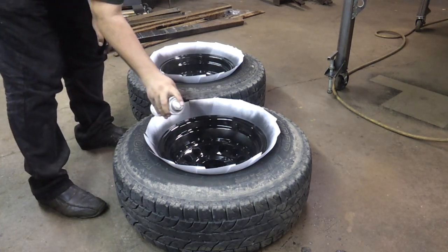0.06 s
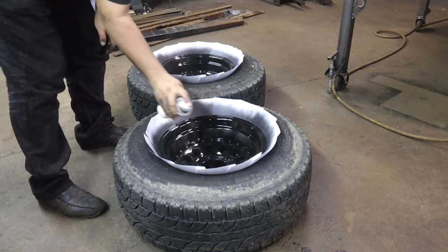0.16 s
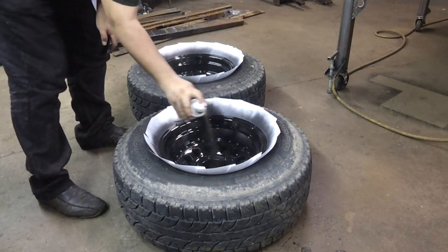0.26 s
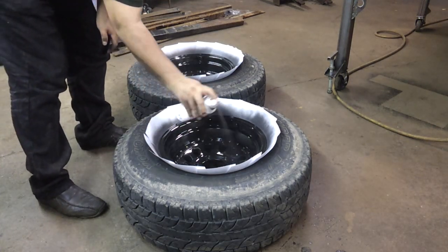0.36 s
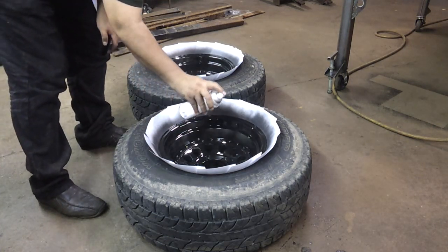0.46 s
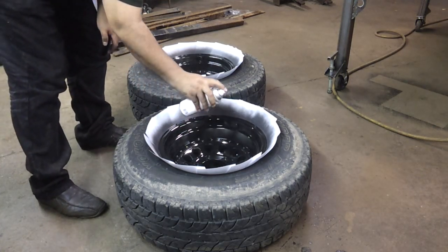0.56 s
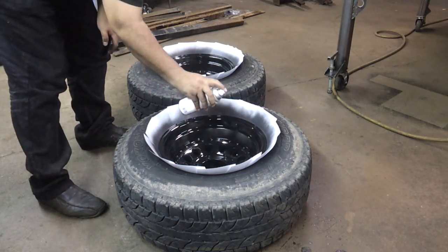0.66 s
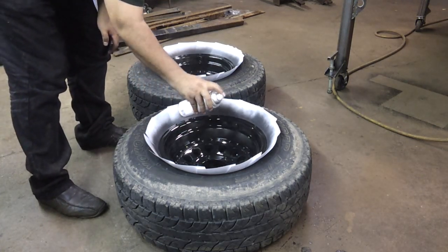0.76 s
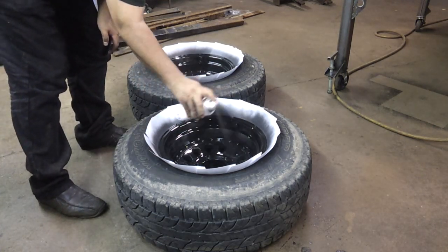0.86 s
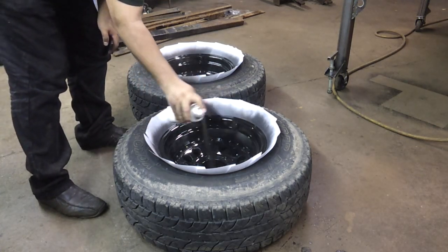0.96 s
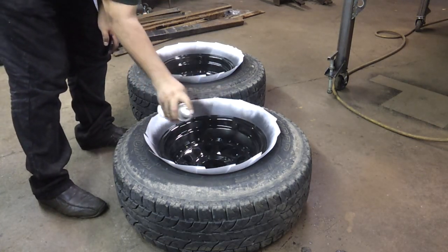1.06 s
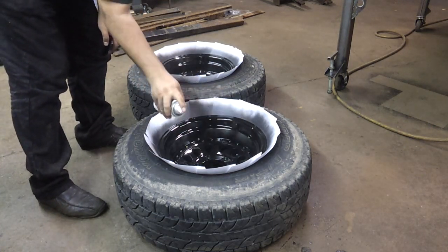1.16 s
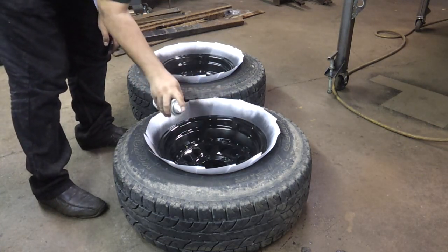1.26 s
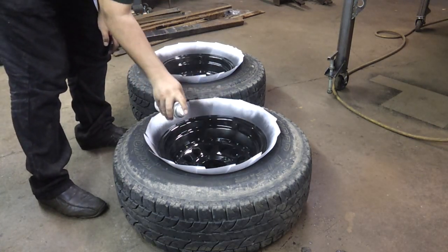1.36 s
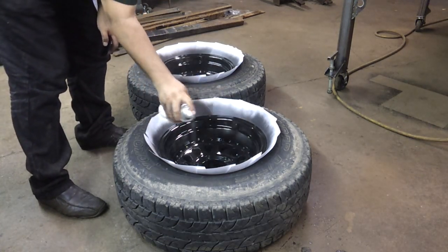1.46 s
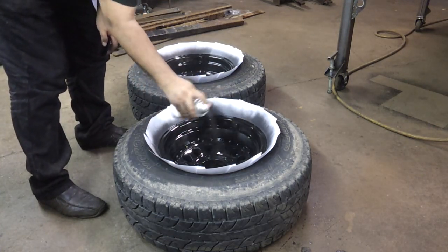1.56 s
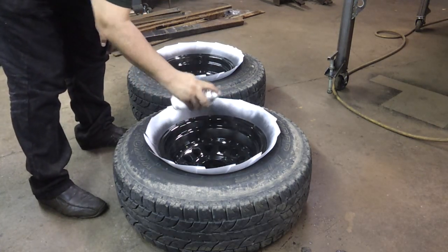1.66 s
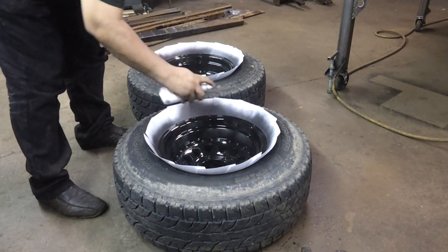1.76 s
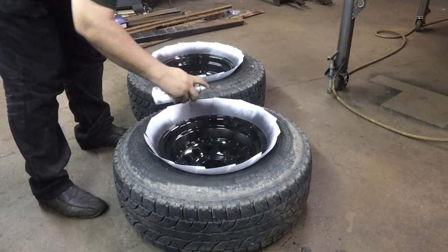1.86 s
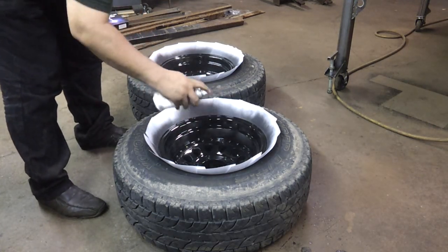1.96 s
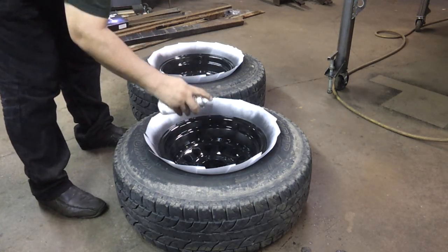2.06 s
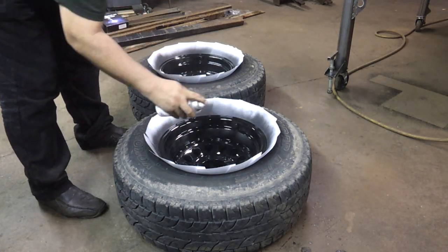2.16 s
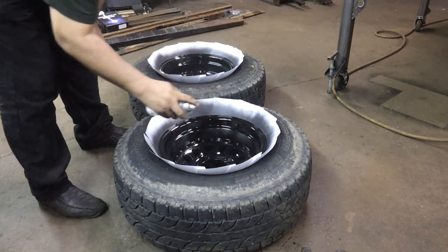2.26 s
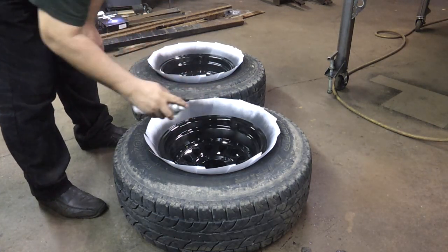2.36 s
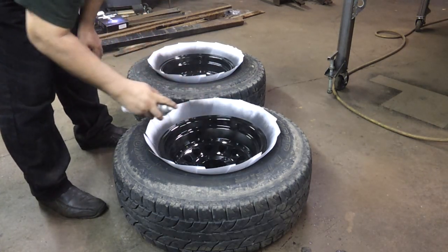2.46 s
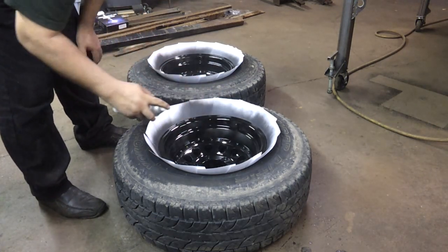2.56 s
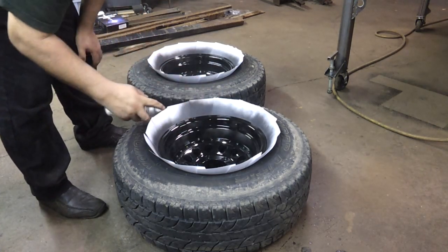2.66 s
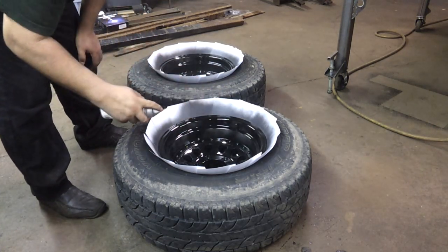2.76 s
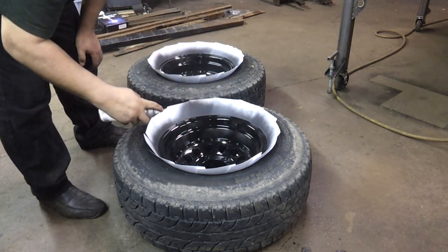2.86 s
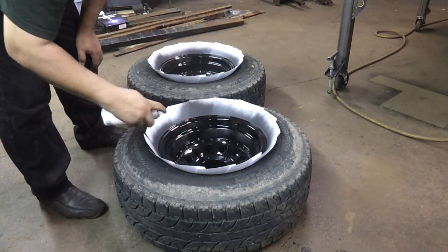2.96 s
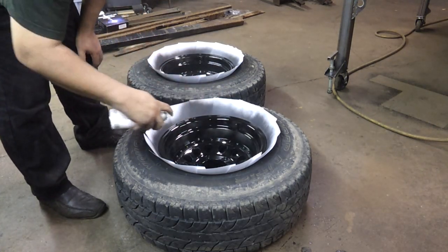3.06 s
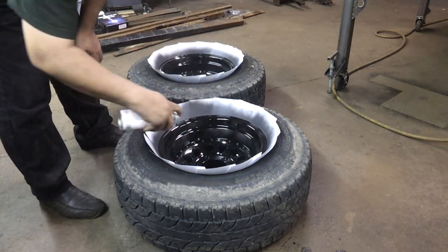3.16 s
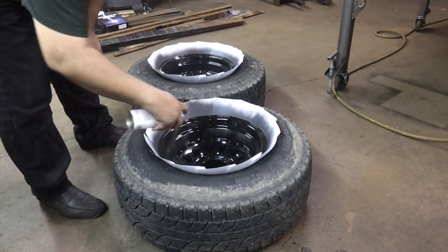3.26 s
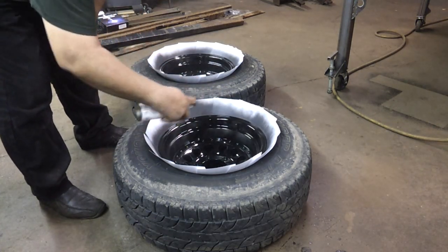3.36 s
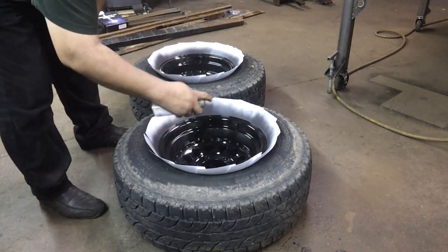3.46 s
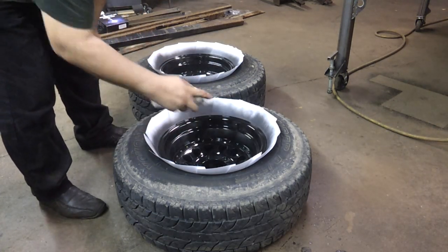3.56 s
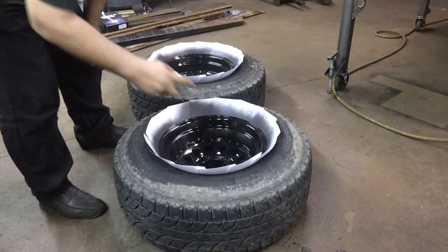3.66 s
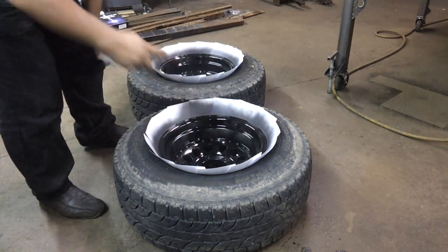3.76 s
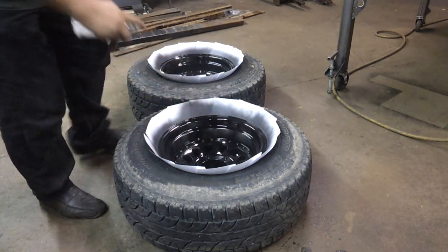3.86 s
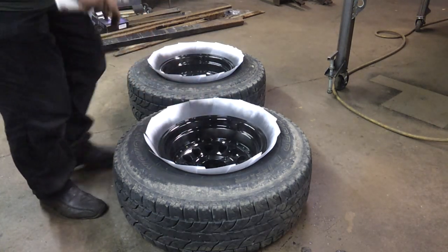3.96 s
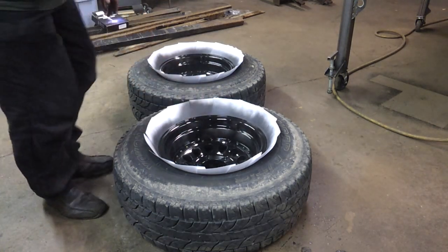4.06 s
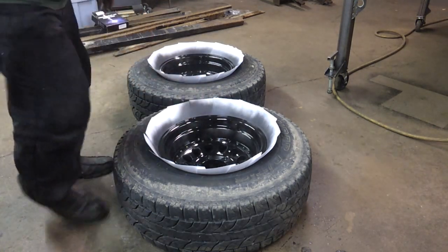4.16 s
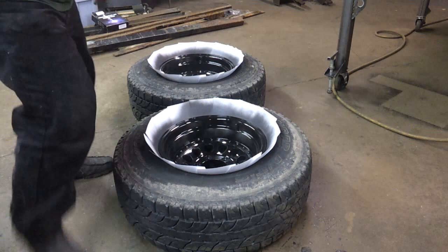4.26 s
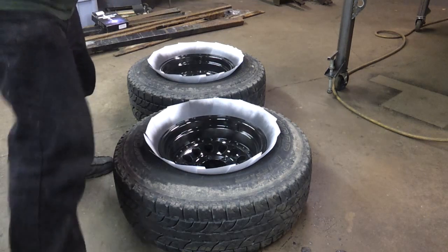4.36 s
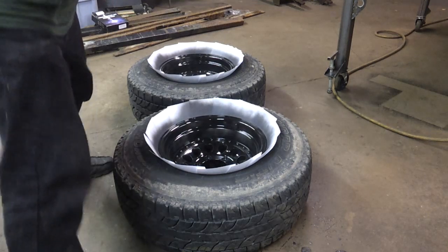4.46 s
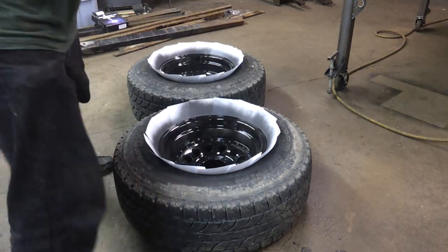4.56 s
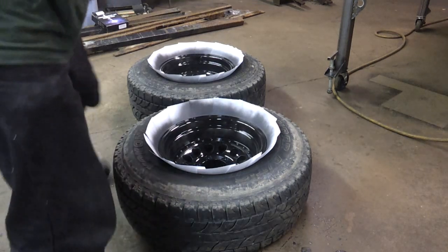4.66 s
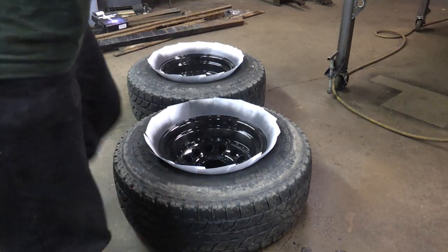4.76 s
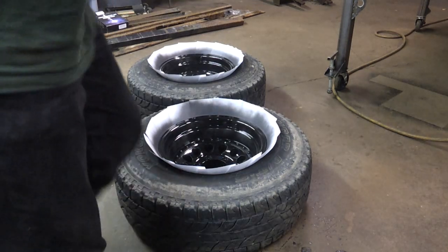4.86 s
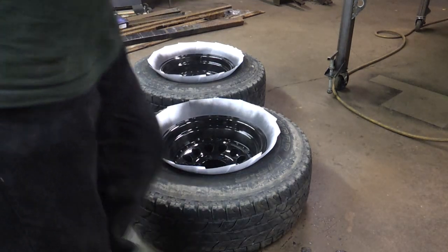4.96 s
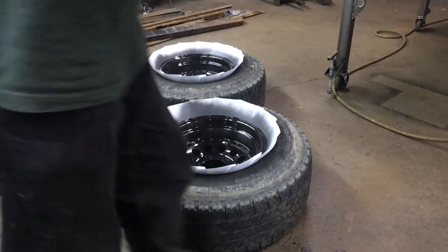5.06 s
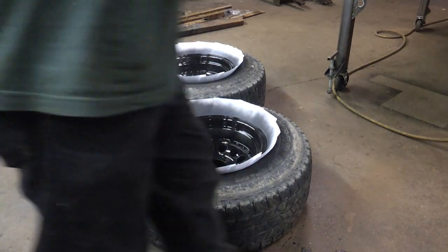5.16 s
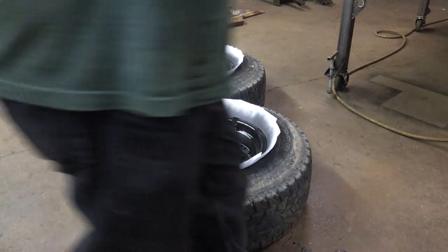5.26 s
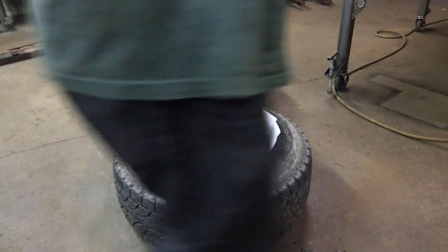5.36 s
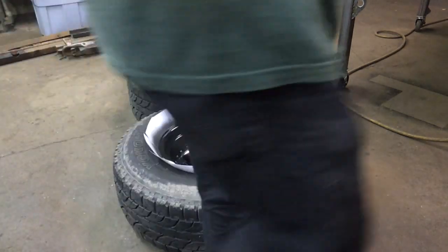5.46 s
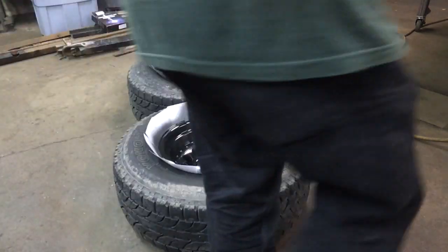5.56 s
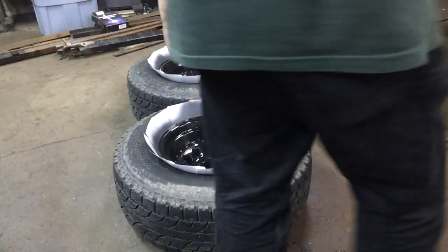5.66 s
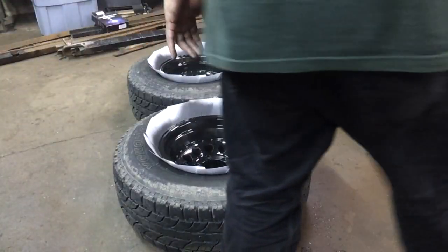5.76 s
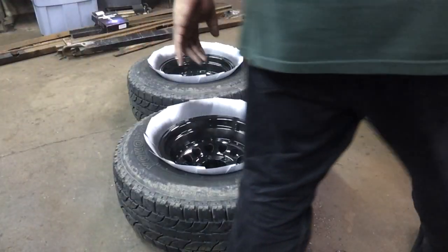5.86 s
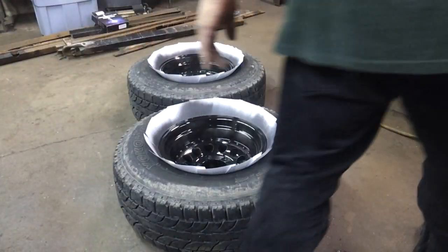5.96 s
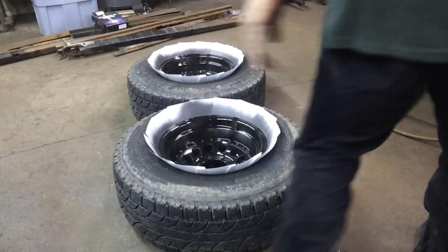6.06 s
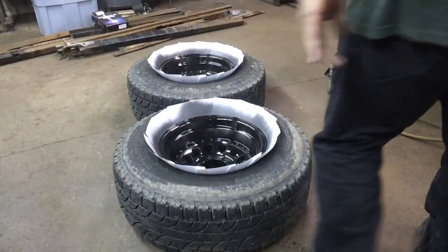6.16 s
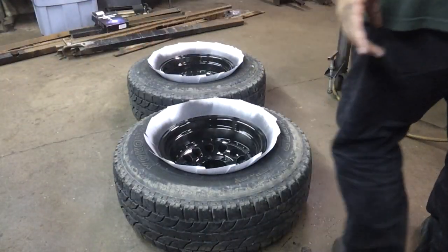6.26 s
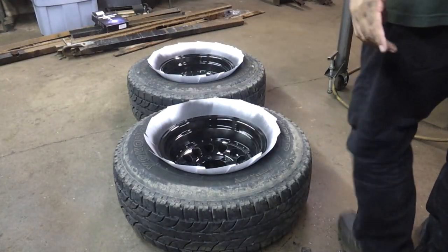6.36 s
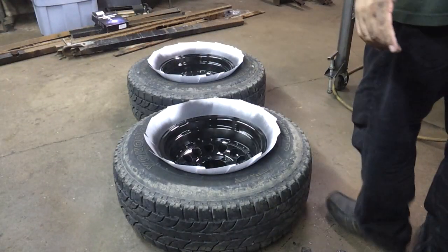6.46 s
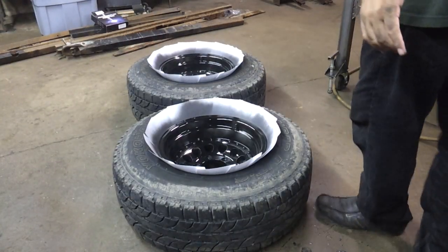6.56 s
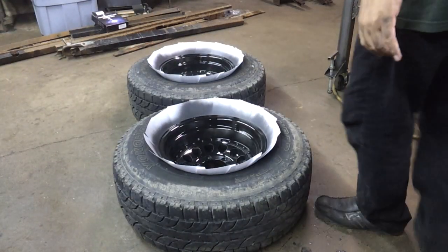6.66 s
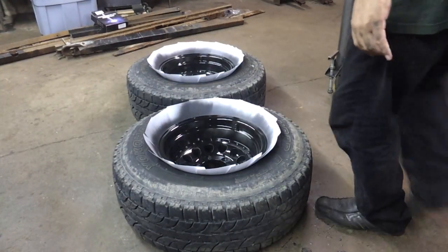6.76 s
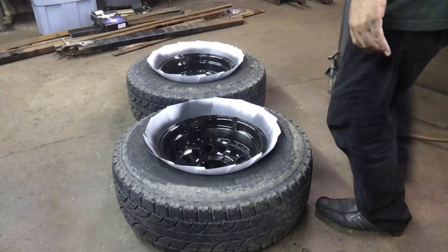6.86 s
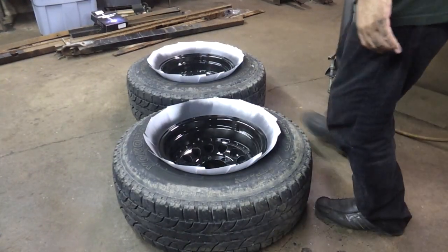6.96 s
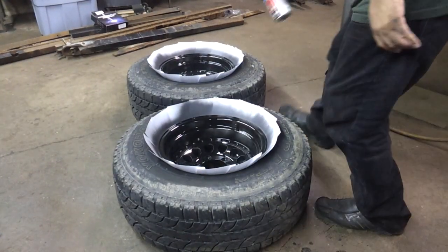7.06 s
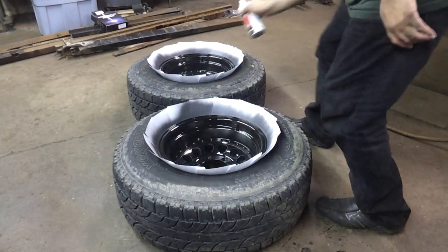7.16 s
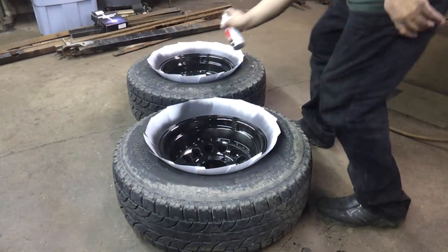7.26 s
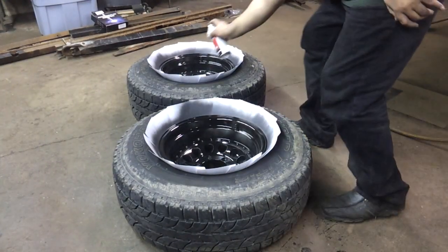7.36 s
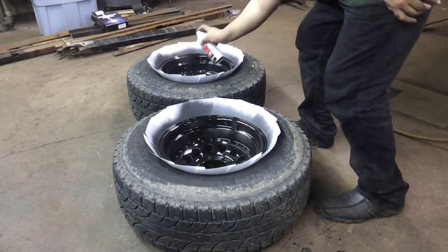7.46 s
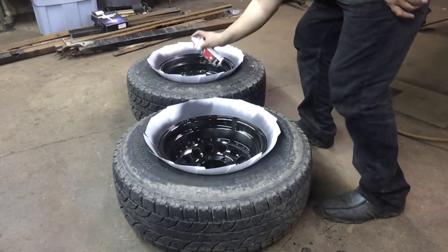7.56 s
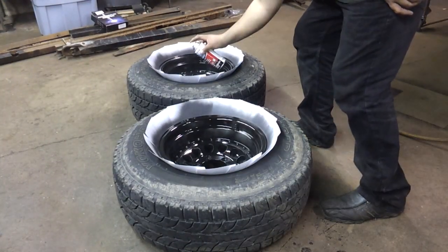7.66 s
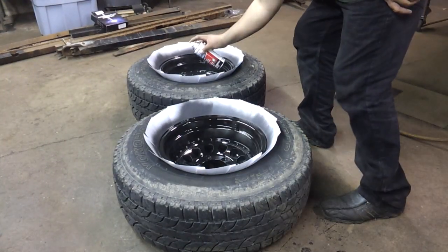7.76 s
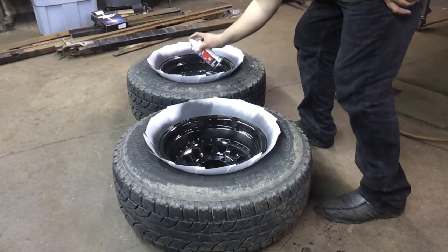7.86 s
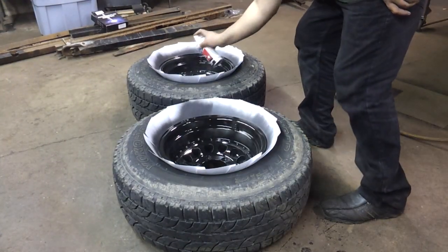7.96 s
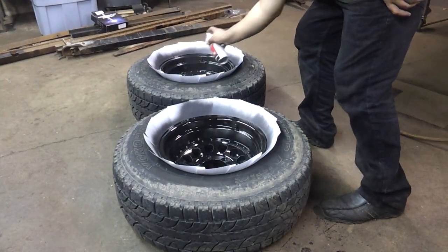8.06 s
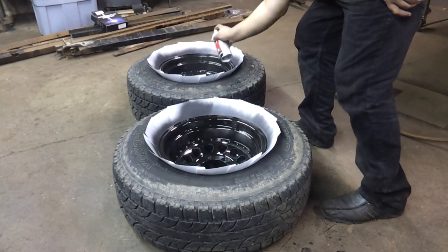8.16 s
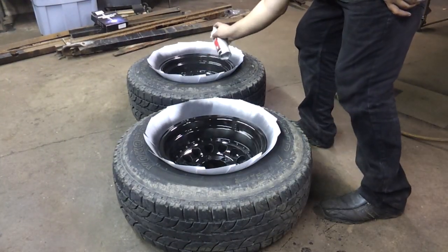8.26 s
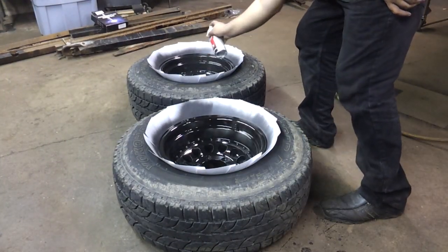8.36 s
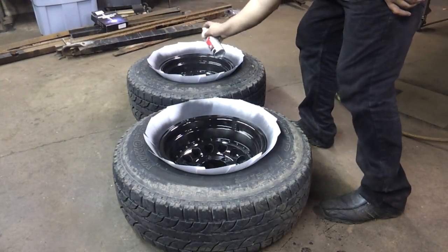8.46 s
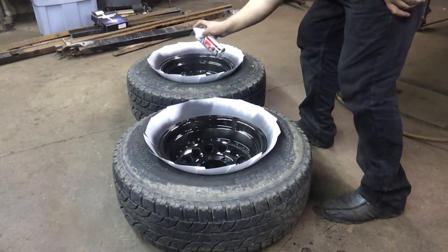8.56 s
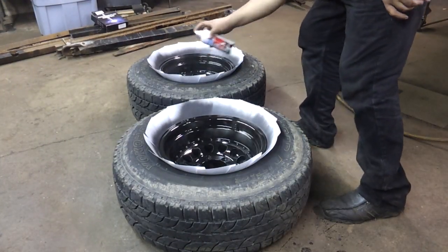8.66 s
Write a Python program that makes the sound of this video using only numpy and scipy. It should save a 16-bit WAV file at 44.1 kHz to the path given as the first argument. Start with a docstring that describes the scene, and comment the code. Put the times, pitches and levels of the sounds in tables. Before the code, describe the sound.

A low, slowly swelling hum fills a hard-walled workshop, with the fading echo of an earlier spray at the start. Bright aerosol bursts of about 0.3 seconds come at 0.14, 0.78 and 1.4, each surging at once then easing, with a faint valve whistle at the opening and a hissy echo after. Single metallic ball clacks fall at 1.9, 2.6 and, weaker, 2.9. A softer burst follows at 3.16. A scuff at 3.8 and a heel thud at 4.0 lead into vigorous can shaking from 4.05 to about 5.6: hard, irregular clacks, chatter and grainy rolling, loudest between 4.2 and 5.1, with another step at 4.45. Dull double footsteps and a drag land near 5.85, then lighter steps and scuffs at 6.5 and 7.0 to 7.4, with stray faint ticks. Short sprays return at 7.36, 7.85 and 8.48, slightly duller, the last running almost to the end.

```python
"""Spray can bursts in a workshop

A hand sprays paint from an aerosol can into a wheel in short bursts of shaped noise, with narrow valve whistles.
The mixing ball clacks and rolls: sharp contacts, chatter and grainy noise drive the resonances of the can.
Shoes step and drag round the tyres as low pushes, dull puffs and noise strokes, over the hum of a hard-walled hall.
Decaying noise tails make the echoes; one microphone with gain control and a soft ceiling hears it all.
"""
import sys
import numpy as np
from scipy import signal
from scipy.io import wavfile
from scipy.ndimage import uniform_filter1d

SR = 44100
rng = np.random.default_rng(int(sys.argv[2]) if len(sys.argv) > 2 else 0)


def dump(signal):
    """Clip the signal to [-1, 1] and save it as 16-bit WAV at the path in sys.argv[1]."""
    limited = np.clip(np.atleast_2d(signal).T, -1, 1)
    pcm = np.round(limited * 32767).astype(np.int16)
    wavfile.write(sys.argv[1], SR, pcm)


N = 383652

# Colour of the jet hiss. Each row: frequency in Hz, relative level in dB per Hz.
JET_COLOUR = [(4000, -17.5), (6000, -9.5), (8000, -2.5), (10500, 0), (13000, -3), (16000, -6.5)]
# Resonances of the can bottom. Each row: frequency in Hz, width in Hz, relative level in dB.
BOTTOM_MODES = [(1180, 560, 21), (1770, 1900, 18), (1970, 1940, 7)]


def gain_of(db):
    """Amplitude factor of a level in dB."""
    return 10 ** (np.asarray(db) / 20)


def evened(x):
    """The same sound at rms 1."""
    return x / np.sqrt(np.mean(x ** 2) + 1e-20)


def read(points, hz):
    """Reads a curve of (Hz, value) points along a logarithmic frequency axis."""
    f, value = np.transpose(points)
    return np.interp(np.log(hz + 1), np.log(f + 1), value)


def add(mix, s, sound):
    """Adds a sound to the mix at s seconds, cut off at the end of the mix."""
    part = mix[..., round(s * SR):][..., :sound.shape[-1]]
    part += sound[..., :part.shape[-1]]


def resonate(x, hz, width):
    """Shifts hz down to zero, smooths, and shifts back: a resonance of gain 1."""
    phase = 2 * np.pi * np.cumsum(np.broadcast_to(hz, x.shape[-1])) / SR
    turn = np.exp(1j * phase)
    r = np.exp(-np.pi * width / SR)
    return 2 * (turn * signal.lfilter([1 - r], [1, -r], x / turn)).real


def resonate_twice(x, hz, first_width, second_width):
    """Two resonances in a row at the same pitch, for steeper skirts."""
    return resonate(resonate(x, hz, first_width), hz, second_width)


def noise(spectrum, patchy_db, size=512):
    """Random short-time spectra with drifting patches, rms 1."""
    hz = np.fft.rfftfreq(size, 1 / SR)
    a, b, patches = rng.standard_normal((N * 4 // size + 5, len(hz), 3)).T
    patches = uniform_filter1d(patches, size=6, axis=0)  # across frequency
    patches = evened(uniform_filter1d(patches, size=12, axis=1))  # across time
    z = (a + 1j * b) * gain_of(read(spectrum, hz)[:, None] + patchy_db * patches)
    return evened(signal.istft(z, nperseg=size, noverlap=size * 3 // 4)[1][:N])


def causal(gain):
    """Impulse response with this gain that starts at once (minimum phase)."""
    log = np.log(np.r_[gain, gain[-2:0:-1]] + 1e-5 * gain.max())
    return np.fft.ifft(np.exp(log - 1j * signal.hilbert(log).imag)).real[:len(gain)]


def hum():
    """Broad hall noise and a few fuzzy low tones; all under 350 Hz swells slowly."""
    # The broad noise. Each row: frequency in Hz, relative level in dB per Hz.
    broad_colour = [(25, -45), (40, -43), (55, 0), (90, -14), (130, -5.5), (270, -5.5), (415, -12),
                    (700, -14.5), (1700, -19.5), (3200, -22), (4700, -22.5), (6000, -32.5), (7300, -26.5),
                    (10200, -25.5), (16000, -28.5)]
    # Machines somewhere in the hall. Each row: frequency in Hz, width in Hz, level in dB.
    drones = [(71.2, 16, -47.5), (135.2, 12, -41.5), (200.3, 4.5, -54)]
    # The lows waver about their mean. Each row: time in seconds, relative level in dB.
    low_swell = [(0.0, -39), (0.68, -36.5), (1.02, -37.5), (2.62, -37), (3.03, -35), (4.07, -37),
                 (4.43, -40.5), (5.18, -43), (5.74, -36.5), (6.49, -35.5), (6.86, -37), (8.3, -36),
                 (8.7, -32.5)]

    wide = gain_of(-32.5) * noise(broad_colour, patchy_db=1.5, size=2048)
    for hz, width, db in drones:
        wide += gain_of(db) * evened(resonate(rng.standard_normal(N), hz, width))
    low = signal.sosfiltfilt(signal.butter(2, 350, fs=SR, output="sos"), wide)
    s, db = np.transpose(low_swell)
    swell = gain_of(np.interp(np.arange(N) / SR, s, db - db.mean()))
    return wide + low * (swell - 1)


def hall_tail():
    """Dense echoes of random sign after the first wall, each band dying at its own speed; energy 1."""
    # How long the hall rings. Each row: frequency in Hz, time to fall by 60 dB in seconds.
    ring_times = [(200, 0.46), (1000, 0.52), (3000, 0.86), (7000, 0.93), (11000, 0.66), (16000, 0.57)]

    first_wall_s, build_up_s = 0.004, 0.0049
    taps = rng.standard_normal(SR) * np.clip((np.arange(SR) / SR - first_wall_s) / build_up_s, 0, 1)
    hz, t, z = signal.stft(taps, SR, nperseg=256)
    fade = gain_of(-60 * t / read(ring_times, hz)[:, None])
    tail = signal.istft(z * fade, SR, nperseg=256)[1][:SR]
    return tail / np.linalg.norm(tail)


def hall(x):
    """Three tails fed in turn, so that like sounds get unlike echoes."""
    turn = np.arange(N) / SR * 2.3  # half turns
    wet = np.zeros(N)
    for k in range(3):
        share = np.sqrt(2 / 3) * np.cos(np.pi * (turn + k / 3))  # the three powers sum to 1
        wet += signal.oaconvolve(x * share, hall_tail())[:N]
    return wet


def earlier_spray():
    """A burst that has just ended still hangs in the hall: jet noise fading steadily."""
    start_db, fade_db_per_s = -24.5, 75
    return gain_of(start_db - fade_db_per_s * np.arange(N) / SR) * noise(JET_COLOUR, patchy_db=2.5)


def footsteps():
    """A heel lands as a brief low push and a dull puff of resonant noise."""
    # Each row: landing in seconds, level in dB, pitch in Hz, time for the puff to fall by 60 dB in seconds.
    steps = [(3.978, -11, 407, 0.019), (4.454, -8, 202, 0.063), (5.834, -14.5, 234, 0.084),
             (5.9, -14.5, 314, 0.067), (6.045, -27, 207, 0.42), (6.155, -26, 300, 0.065),
             (6.547, -21.5, 334, 0.18), (7.045, -20.5, 253, 0.097), (7.149, -22, 283, 0.068),
             (7.243, -20.5, 220, 0.08), (7.312, -24.5, 436, 0.19), (7.43, -35, 500, 0.075)]

    out, t = np.zeros(N), np.arange(9000) / SR
    for s, db, hz, t60 in steps:
        air = rng.standard_normal(len(t))
        push = 1.2 * np.sin(2 * np.pi * hz * t) * gain_of(-30 * t / t60)  # dies sooner than the puff
        puff = 0.53 * evened(resonate_twice(air, hz, 150, 160))
        puff += 0.35 * evened(resonate_twice(air, 2 * hz, 500, 480))
        attack = np.minimum(t / 0.0013, 1)
        add(out, s, gain_of(db - 60 * t / t60) * (push + puff) * attack)
    return out


def scuffs():
    """Soles and cloth drag: noise in three colours that starts fast and fades."""
    # Each row: start in seconds, length in seconds, then sole, grit and cloth level in dB.
    drags = [(3.769, 0.14, -33, -40, -39.5), (3.975, 0.068, -25, -32, -38), (5.841, 0.19, -26, -31.5, -36),
             (6.03, 0.1, -33.5, -47, -48), (6.545, 0.11, -35, -41, -41), (6.679, 0.12, -43, -42, -31.5),
             (6.82, 0.24, -47, -42, -42), (7.038, .19, -32, -36.5, -41.5), (7.219, 0.23, -30, -28.5, -34)]
    # Dull rub of the sole. Each row: frequency in Hz, relative level in dB per Hz.
    sole_colour = [(150, -35), (350, 0.5), (900, -5), (2200, -11), (4000, -28)]
    # Grit under the sole. Each row: frequency in Hz, relative level in dB per Hz.
    grit_colour = [(1200, -12), (2500, -3.5), (4000, -2), (6000, -9), (8000, -35)]
    # Airy brush of cloth. Each row: frequency in Hz, relative level in dB per Hz.
    cloth_colour = [(4000, -16), (7000, 0), (9000, 0), (12000, -2), (16000, -41)]

    ramp_s, fade_db = 0.017, -8  # the ramp serves both ends; the fade runs over the whole drag
    level = np.zeros((3, N))
    for s, length, *db in drags:
        u = np.arange(0, length, 1 / SR)
        stroke = np.minimum(np.minimum(u, length - u) / ramp_s, 1) * gain_of(fade_db * u / length)
        add(level, s, gain_of(db)[:, None] * stroke)
    colours = (sole_colour, grit_colour, cloth_colour)
    return sum(part * noise(colour, patchy_db=3.0) for part, colour in zip(level, colours))


def modes_power(modes, hz):
    """Power response of a group of steep modes; white drive keeps its power."""
    power = sum(gain_of(2 * db) / (1 + (2 * (hz - f) / width) ** 2) ** 2 for f, width, db in modes)
    return power / power.mean(0)


def can_colour(hz, db, bottom_db, shoulder_db, wall_hz, gap_hz, tilt_db):
    """Gain of the whole can; grip and paint shift the wall and shoulder modes."""
    # Resonances of the wall. Each row: frequency in Hz, width in Hz, relative level in dB.
    wall_modes = [(3170, 910, 13.5), (3650, 1700, 4), (4860, 1900, -6)]
    # Resonances of the shoulder. Each row: frequency in Hz, width in Hz, relative level in dB.
    shoulder_modes = [(7330, 1280, 11.6), (8200, 550, 9.8), (10170, 2700, 7.7), (13100, 4200, 0.5)]

    wall_ref_hz, gap_ref_hz = 3200, 9000  # wall centre and shoulder gap that the modes are tuned to
    stretch = (wall_ref_hz / wall_hz) ** 5.8  # a higher wall also rings wider
    wall = modes_power(wall_modes, wall_ref_hz + (hz - wall_hz) * stretch)
    bottom = gain_of(2 * bottom_db) * modes_power(BOTTOM_MODES, hz)
    tilt = tilt_db * np.tanh((hz - gap_hz) / 400)
    shoulder = gain_of(2 * (shoulder_db + tilt)) * modes_power(shoulder_modes, hz * gap_ref_hz / gap_hz)
    return gain_of(db) * np.sqrt(wall + bottom + shoulder)


def grip_at(s):
    """How the can is held colours all blows until the next swing: the grip that holds at time s."""
    # Each row: start in seconds, wall centre in Hz, shoulder gap in Hz, shoulder tilt in dB about the gap,
    # hall level in dB.
    grips = np.array([(0.0, 3170, 8950, .6, 1), (2.5, 3100, 8950, -0.5, -2.5), (4.0, 3140, 8900, -0.5, -2),
                      (4.2, 3370, 9540, -0.5, -6.5), (4.33, 3150, 7840, 3.5, -9.5),
                      (4.5, 3130, 8000, 1.8, -5), (4.62, 3120, 8200, 2.5, -4), (4.73, 3450, 9740, 0, -2),
                      (4.93, 3180, 9400, 0.2, -6), (5.03, 3500, 9260, 0.7, 0.5), (5.2, 3400, 8750, .1, -1),
                      (5.4, 3530, 9000, 1.3, -7), (5.8, 3360, 9050, -1, 1), (6.1, 3100, 8500, .1, 4),
                      (6.6, 3580, 9750, .1, -8), (7.1, 3570, 8700, 1, 0)])
    return grips[np.maximum(np.searchsorted(grips[:, 0], s) - 1, 0)].T[1:]


def ball_blows():
    """The ball strikes the can: a sharp contact and a short chatter. Returns near sound and hall feed."""
    # Each row: blow in seconds, wall level in dB, bottom level and shoulder level in dB relative to the wall.
    clacks = [(1.871, -14.5, -2.5, 0), (2.577, -13.5, -8, -4.5), (2.872, -24, -10, -2),
              (4.057, -5, -7.5, -5), (4.132, -23.5, 9.5, 2), (4.2226, -8.5, 3, -19), (4.227, -4.5, -2, -7),
              (4.231, -4.5, -6, -6.5), (4.239, -10, -1, -2.5), (4.2432, -9, -11, 0),
              (4.2793, -22, 12.5, -6), (4.3599, -8.5, 2.5, -1), (4.42, -25, 12, -13),
              (4.483, -24.5, 18, 4.5), (4.511, 1, -8, -16), (4.516, -6, -7.5, -24), (4.551, -16, -13, -18),
              (4.569, -13.5, 3.5, -16), (4.587, -14, -4, -23), (4.643, -5, -1.5, -4),
              (4.671, -16.5, 3, -16), (4.754, -5, -6.5, -15), (4.7579, -4.5, -5.5, -1.5),
              (4.766, 0, -11, -11), (4.864, -9.5, -22, -18), (4.876, -22.5, 9.5, -4), (4.957, -10, 4.5, 3),
              (4.983, -24, 14, 6), (5.061, 1, -24, -8), (5.066, -7, -16, -5), (5.075, -21, -18, 0),
              (5.088, -8, -8, -8), (5.27, -10, -3, 1.5), (5.42, -21.5, 6, 7), (5.436, -10.5, -18, -6.5),
              (5.531, -25.5, 14, -10), (5.573, -22.5, 9, -4), (5.855, -36, 14, 11),
              (6.213, -26.5, -1.5, -2.5), (6.697, -31, -17, 6), (7.232, -32, -10, 3)]

    rattle_s = 0.0047  # chatter after a 0 dB blow
    rattle_growth = 0.18  # harder blows chatter longer: dB of length per dB of blow
    far_side = -0.074  # weak blows land out of sight and feed the hall more: dB per dB of blow
    near, far = np.zeros((2, N))
    hz, t = np.fft.rfftfreq(2048, 1 / SR), np.arange(800) / SR
    for s, db, bottom_db, shoulder_db in clacks:
        *grip, hall_db = grip_at(s)
        click = causal(can_colour(hz, db, bottom_db, shoulder_db, *grip))
        fade = np.exp(-(t / (rattle_s * gain_of(rattle_growth * db))) ** 2)
        chatter = rng.standard_normal(len(t)) * fade
        chatter *= np.linalg.norm(fade) / np.linalg.norm(chatter)  # same energy every time
        contact = 6.8 * (t == 0)
        add(near, s, np.convolve(0.81 * chatter + contact, click))
        # all sides of the can together send out one even click
        add(far, s, 12.9 * gain_of(hall_db + far_side * (db + 13)) * click)
    return np.array([near, far])


def ball_rolling():
    """Between blows the ball rolls and the paint slops: grainy noise through the can, with little hops."""
    # Each row: time in seconds, wall level in dB, bottom level and shoulder level in dB relative to the wall.
    roll = [(3.99, -42, -11, 4), (4.214, -38, -3, 3), (4.26, -21.5, -27, -11), (4.4, -31, 2, 4),
            (4.576, -25.5, -4, -14.5), (4.698, -25, -2, -6), (4.866, -27.5, -17, -21), (5.0, -26, -19, -4),
            (5.33, -25, -5, -9), (5.426, -21, -12.5, -14), (5.692, -36, 2.5, -9), (5.818, -43, -2, -14)]

    grain = evened(uniform_filter1d(rng.standard_normal(N), size=120))
    grit = rng.standard_normal(N) * gain_of(2.7 * grain)
    bins, times, z = signal.stft(grit, SR, nperseg=256, noverlap=192)
    s, *levels = np.transpose(roll)
    db, bottom_db, shoulder_db = (np.interp(times, s, v, left=-90, right=-90) for v in levels)
    *grip, _ = grip_at(times)
    colour = can_colour(bins[:, None], db, bottom_db, shoulder_db, *grip)
    rolling = signal.istft(z * colour, SR, nperseg=256, noverlap=192)[1][:N]

    hops_per_s, hop_db = 35, 20.5  # hops on the bottom, least level relative to its roll
    hop_level = gain_of(hop_db + 4.4 * np.minimum(rng.exponential(1, N), 2))
    hops = hop_level * (rng.random(N) < hops_per_s / SR)
    hops *= gain_of(np.interp(np.arange(N) / SR, times, db + bottom_db))
    bottom_ring = causal(np.sqrt(modes_power(BOTTOM_MODES, np.fft.rfftfreq(2048, 1 / SR))))
    return rolling + signal.oaconvolve(hops, bottom_ring)[:N]


def valve_whistles():
    """The valve whistles as it cracks open: narrow gliding noise."""
    # Each row: start in seconds, length in seconds, start pitch in Hz, end pitch in Hz, level in dB.
    glides = [(.122, .02, 14000, 13800, -38), (0.752, 0.058, 11300, 10700, -26),
              (1.373, 0.026, 7800, 8200, -26), (1.385, 0.027, 12700, 12700, -34),
              (3.115, 0.045, 2950, 2750, -29.5), (3.137, .035, 8360, 9250, -30),
              (7.355, 0.041, 9200, 8900, -23), (7.82, 0.035, 9000, 8900, -25)]

    out = np.zeros(N)
    for s, length, start_hz, end_hz, db in glides:
        hz = np.linspace(start_hz, end_hz, round(length * SR))
        tone = resonate(rng.standard_normal(len(hz)), hz, 250)
        add(out, s, gain_of(db) * evened(tone) * np.hanning(len(hz)))
    return out


def spray():
    """Turbulent jet hiss, a duller hiss where it meets the rim, and a ring of the can that sags as pressure drops."""
    # One row a press of the button. Each row: valve opens in seconds, open for in seconds, first surge in dB,
    # held jet in dB, lower hiss in dB relative to the jet, brightness from -1 to 1, can ring at opening in dB,
    # can ring at shutting in dB, ring pitch in Hz, ring width at opening in Hz.
    bursts = [(0.138, 0.29, -11, -19, -12.5, 0.079, -21, -31, 2910, 300),
              (0.78, 0.3, -12, -18.5, -13, 0.14, -27.5, -42, 2380, 800),
              (1.402, 0.26, -12.5, -20.5, -11.5, 0.079, -22, -36, 2780, 696),
              (3.163, .25, -14, -22, -9.5, 0.017, -36, -35, 2840, 700),
              (7.362, 0.24, -14.5, -21.5, -13.5, -.15, -28, -47, 2780, 450),
              (7.848, 0.23, -14, -21.5, -13.5, -0.1, -30.5, -39, 2920, 600),
              (8.484, .165, -12.5, -22, -12, -0.18, -31.5, -42, 2690, 800)]
    # Colour of the duller hiss. Each row: frequency in Hz, relative level in dB per Hz.
    lower_colour = [(500, -60), (1200, -6), (2200, -0.5), (4000, 3), (6000, -2.5), (8000, -42),
                    (11000, -41)]

    open_s, crack_db, surge_s = 0.05, -12.5, 0.066  # the jet climbs from crack_db, then its surge dies away
    ring_fade_db_per_s, ring_back_db_per_s = 136, 110  # the can rings most while the valve is moving
    low_dip_db = -3.5  # the lower hiss thins out in mid burst
    thin_ring_hz = 130  # width of the ring that comes back at shutting
    level, can, breathy = np.zeros((3, N)), np.zeros(N), rng.standard_normal(N)
    for (s, length, surge_db, held_db, low_db, bright,
         opening_db, shutting_db, ring_hz, wide_ring_hz) in bursts:
        t = np.arange(0, length, 1 / SR)
        valve = signal.windows.tukey(len(t), .03)
        climb_db = crack_db * np.maximum(1 - t / open_s, 0) ** 2
        surge = (surge_db - held_db) * np.exp(-np.maximum(t - open_s, 0) / surge_s)
        jet_db = climb_db + held_db + surge
        dip_db = low_dip_db * np.sin(np.pi * t / length) ** 2
        jet, low = valve * gain_of([jet_db, jet_db + low_db + dip_db])
        add(level, s, np.array([jet, low, bright * jet]))

        hz = ring_hz * np.linspace(1.02, .97, len(t))
        breath = breathy[round(s * SR):][:len(t)]
        wide = evened(resonate_twice(breath, hz, wide_ring_hz, wide_ring_hz))
        thin = evened(resonate_twice(breath, hz, thin_ring_hz, thin_ring_hz))
        opening = gain_of(opening_db - ring_fade_db_per_s * t) * wide
        shutting = gain_of(shutting_db - ring_back_db_per_s * (length - t)) * thin
        add(can, s, valve * (opening + shutting))
    jet, low, bright_jet = level
    hiss = noise(JET_COLOUR, patchy_db=2.0)
    jet_hiss = jet * hiss - bright_jet * np.roll(hiss, 1)  # taking away the last sample brightens
    return jet_hiss + can + low * noise(lower_colour, patchy_db=2.5)


def scene():
    """Mixes near sounds, their hall echoes and the background, the same on both channels."""
    feet = footsteps() + scuffs()
    can, can_far = ball_blows() + ball_rolling()  # rolling goes to both near sound and hall feed
    jet = spray() + valve_whistles()
    wet = hall(gain_of(-3.0) * jet + can_far + gain_of(-4.0) * feet)
    mix = hum() + earlier_spray() + wet + feet + can + gain_of(-1.0) * jet
    return np.array([mix, mix])


def record(dry):
    """Gain control turns loud passages down and recovers slowly; a soft ceiling; then the band limit."""
    threshold_db, recovery_db_per_s = -21.0, 12.0
    power_db = 10 * np.log10(abs(uniform_filter1d(dry[0] ** 2, size=900)) + 1e-12)
    fall = np.arange(N) * recovery_db_per_s / SR
    held_db = np.maximum.accumulate(power_db + fall) - fall
    over_db = np.maximum(held_db - threshold_db, 0)
    ducked = dry / gain_of(0.087 * uniform_filter1d(over_db, size=400))  # dB of cut per dB over
    # the microphone lacks deep bass
    ducked = signal.sosfilt(signal.butter(2, 42, "high", fs=SR, output="sos"), ducked)
    ceiling = ducked / (1 + abs(ducked) ** 4) ** (1 / 4)
    band_limit = signal.firwin(511, 15800, window=("kaiser", 9), fs=SR)  # low-pass, edge in Hz
    return np.clip(signal.oaconvolve(ceiling, band_limit[None], "same"), -1, 1)


dry = scene()
out = record(dry)
dump(out)
```